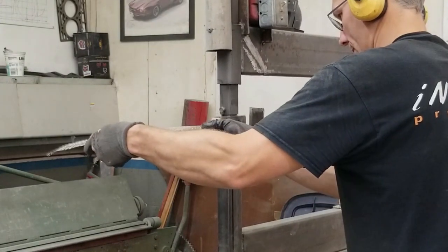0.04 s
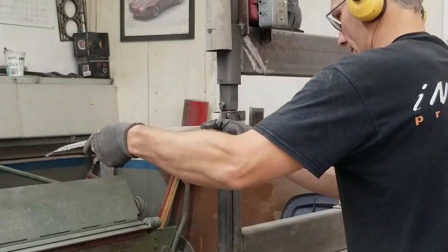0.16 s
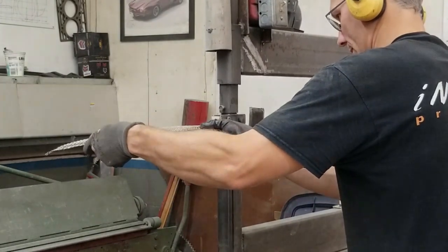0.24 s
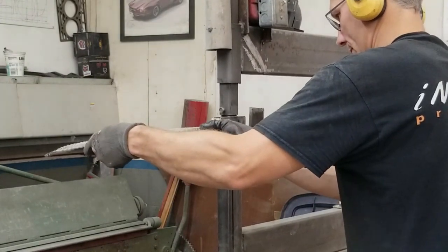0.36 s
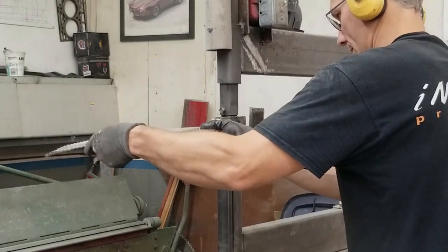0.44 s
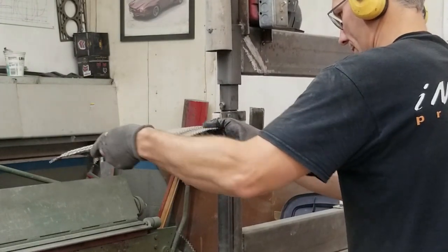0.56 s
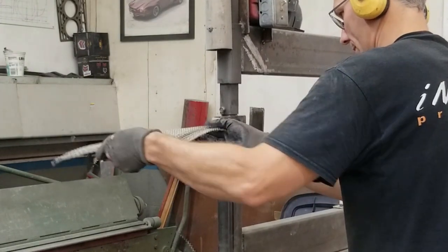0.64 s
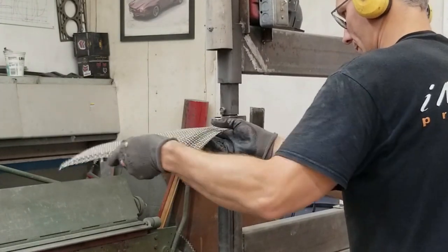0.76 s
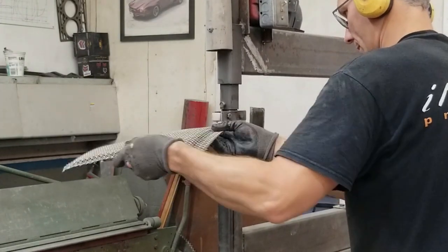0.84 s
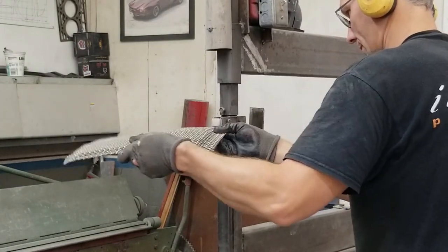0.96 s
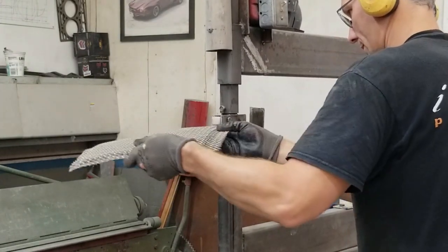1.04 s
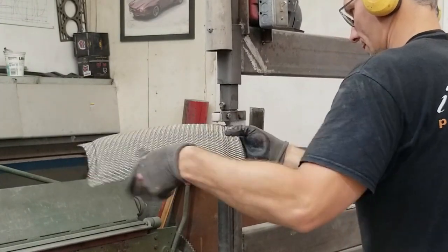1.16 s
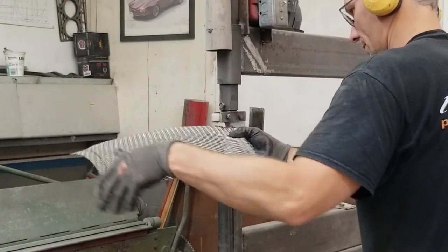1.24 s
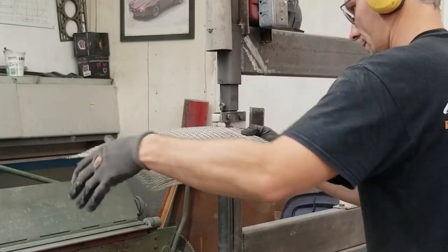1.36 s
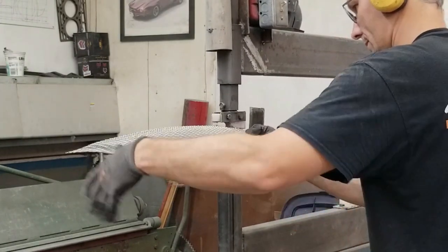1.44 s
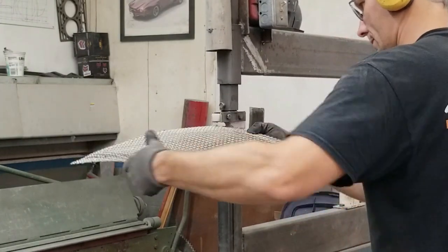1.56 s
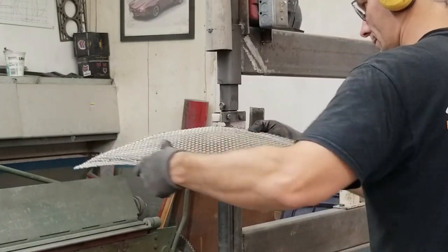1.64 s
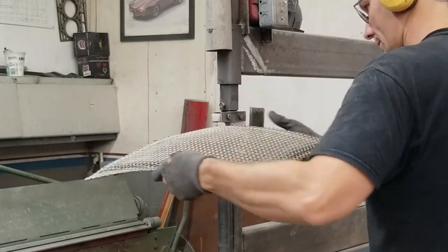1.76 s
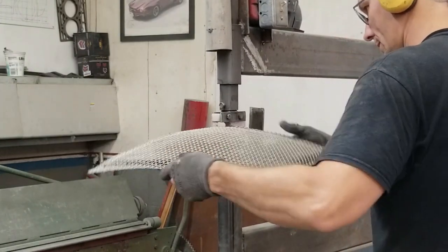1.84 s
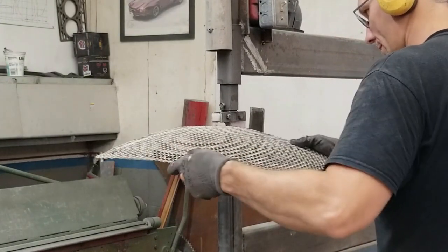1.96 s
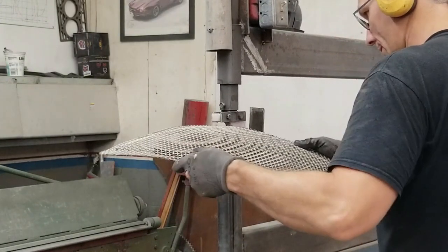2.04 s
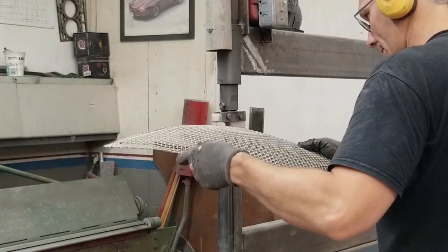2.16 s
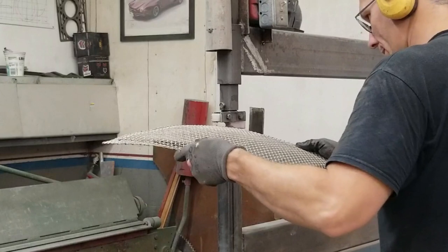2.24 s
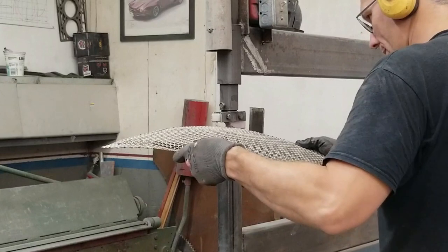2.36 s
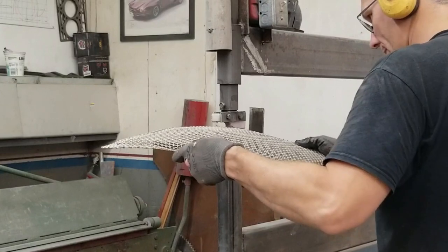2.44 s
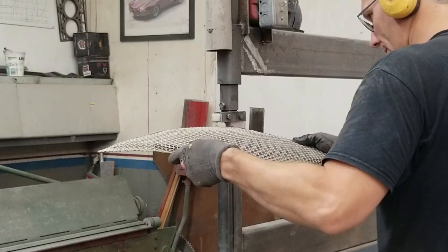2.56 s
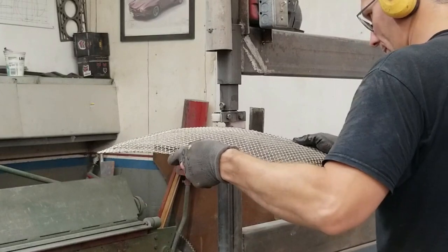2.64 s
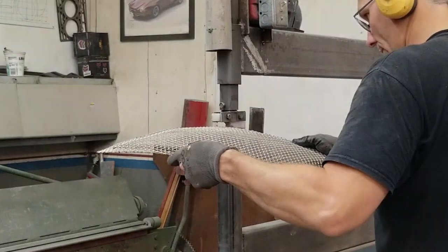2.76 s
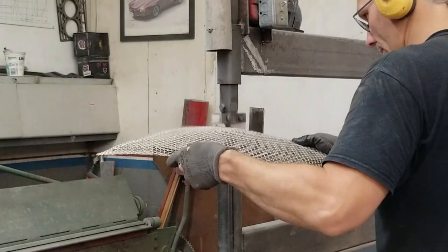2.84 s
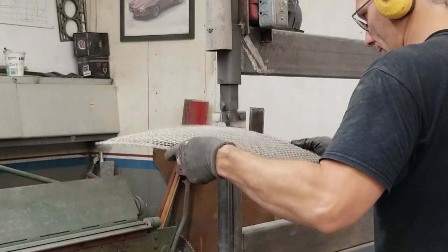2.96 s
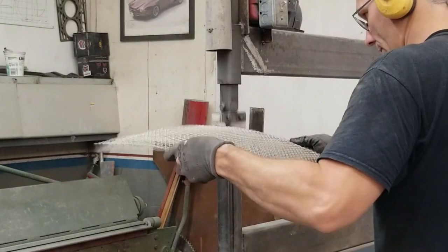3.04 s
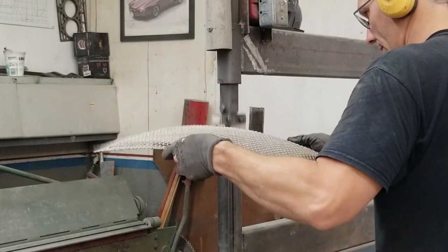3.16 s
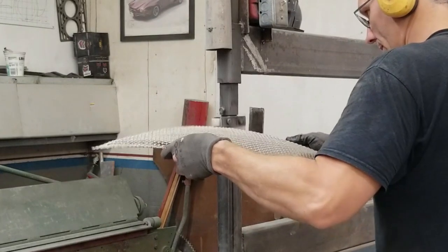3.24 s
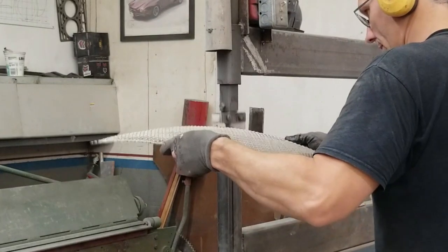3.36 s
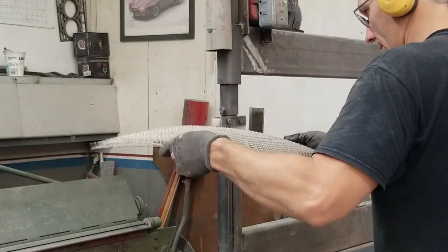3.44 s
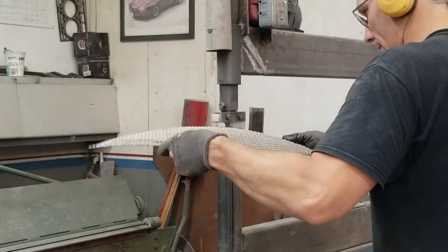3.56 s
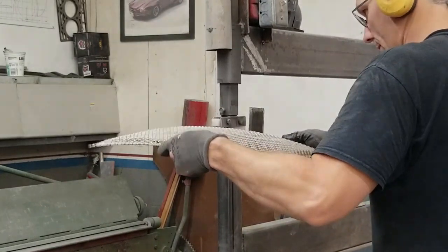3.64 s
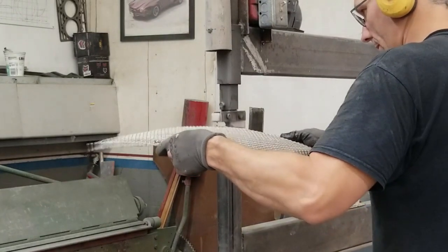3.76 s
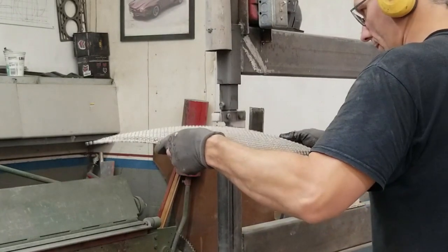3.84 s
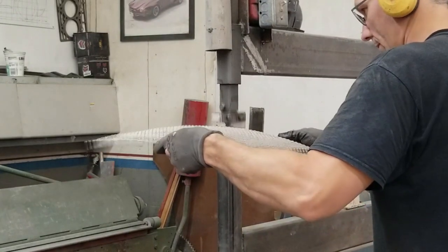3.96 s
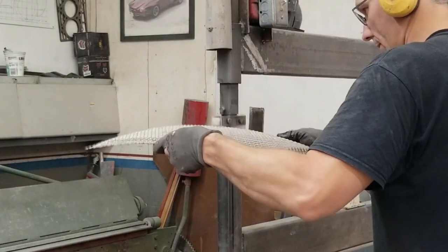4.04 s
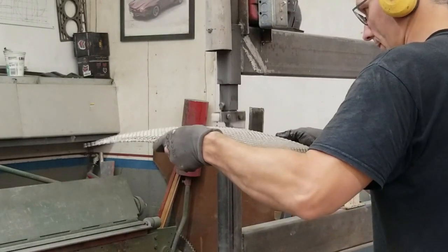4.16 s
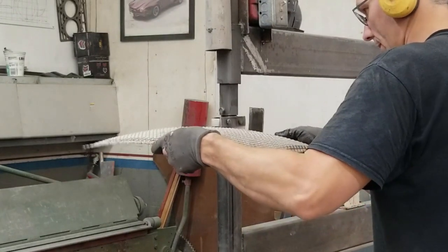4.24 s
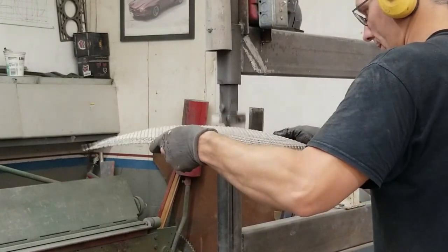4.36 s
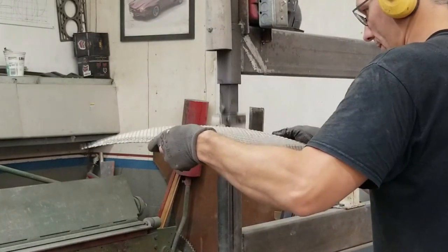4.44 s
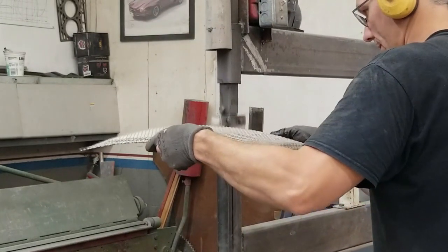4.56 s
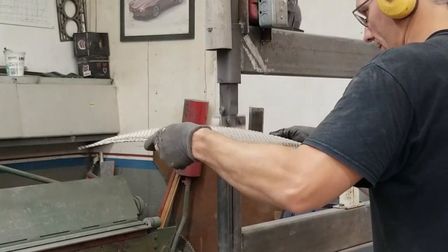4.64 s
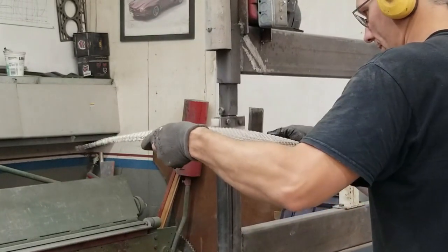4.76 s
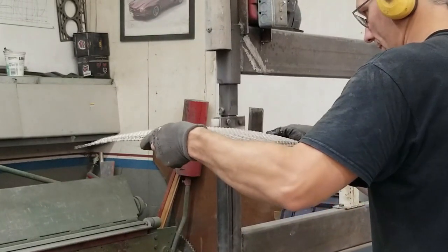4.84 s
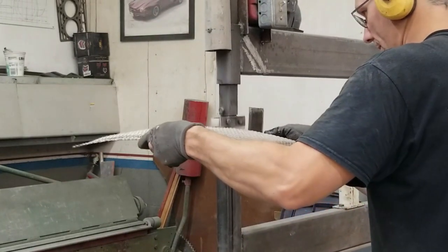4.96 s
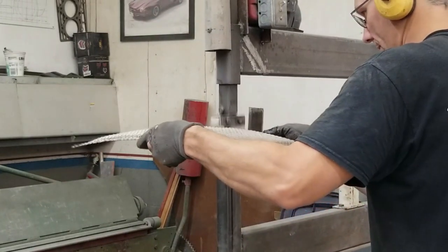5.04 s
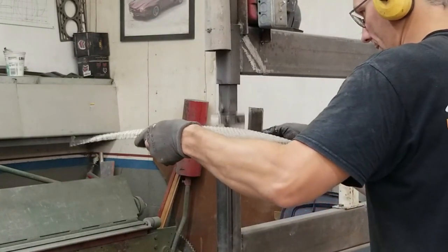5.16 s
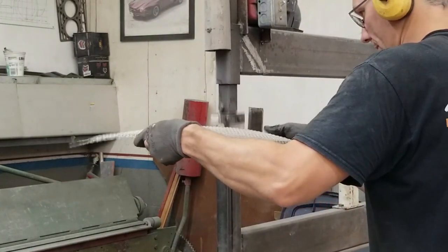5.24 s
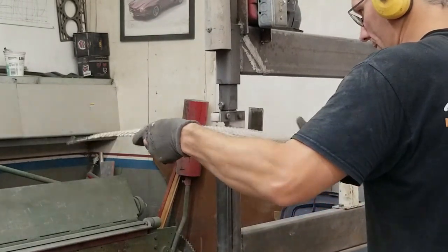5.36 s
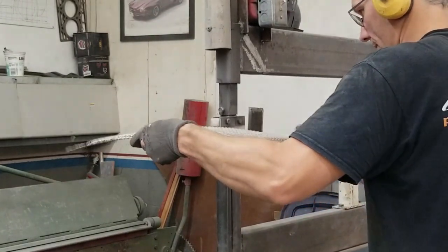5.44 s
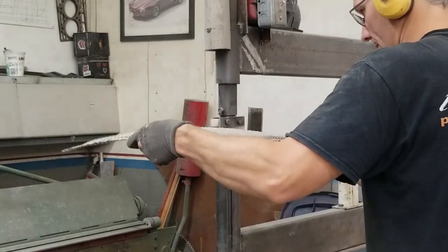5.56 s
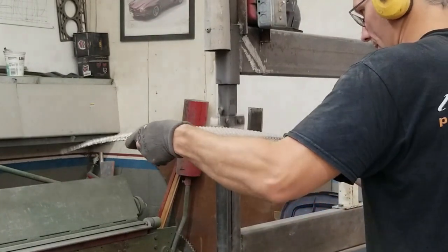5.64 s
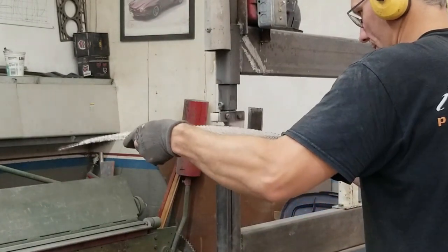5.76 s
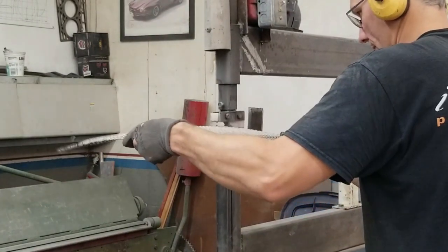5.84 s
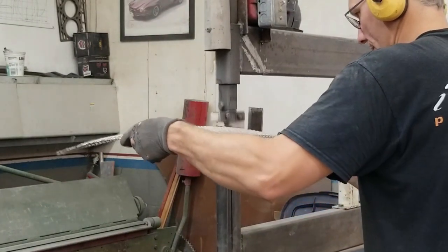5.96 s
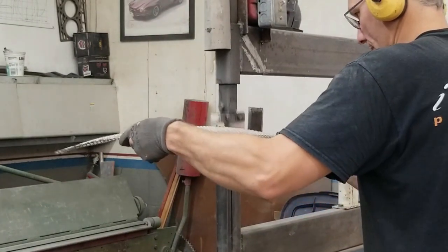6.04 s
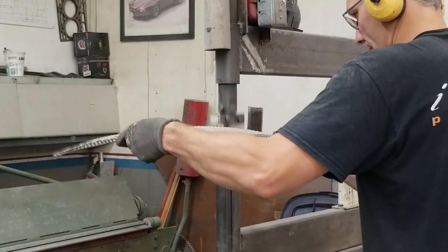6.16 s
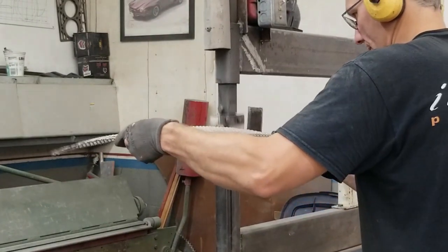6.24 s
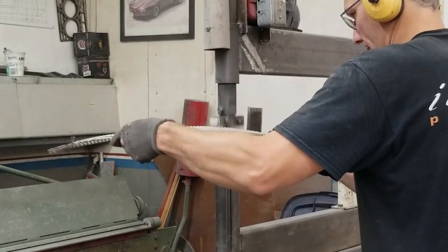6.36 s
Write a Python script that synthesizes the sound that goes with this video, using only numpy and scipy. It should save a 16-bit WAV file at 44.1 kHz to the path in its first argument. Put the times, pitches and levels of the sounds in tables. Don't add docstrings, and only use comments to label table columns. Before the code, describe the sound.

Rapid mechanical hammering, roughly fourteen blows a second, makes a sheet of steel mesh clatter and sizzle. After an opening tail and one slowing run comes nearly two seconds of faint workshop murmur, linkage ticks and ringing frame members. Bumps and a tiny squeak announce the restart; dense, distorted rattling then continues to the end, close to a crude camera microphone with short hard room reflections.

```python
import sys
import numpy as np
from scipy import signal
from scipy.fft import rfft, irfft
from scipy.io import wavfile
from scipy.ndimage import uniform_filter1d

SR = 44100
rng = np.random.default_rng(int(sys.argv[2]) if len(sys.argv) > 2 else 0)


def boost_factor(decibels):
    exponent = np.asarray(decibels, float) / 20
    return 10 ** exponent


def waveform_to_disk(signal):
    frames = np.transpose(np.atleast_2d(signal))
    scaled = np.clip(frames, -1, 1) * 32767
    samples = np.round(scaled).astype(np.int16)
    wavfile.write(sys.argv[1], SR, samples)


N = 282240
T = np.arange(N) / SR
HZ = np.fft.rfftfreq(N, 1 / SR)

# (frequency [Hz], width [Hz], level over the smooth spectrum [dB])
FRAME = [(98, 15, -4), (290, 60, -3), (584, 50, -2), (717, 50, -4), (815, 45, -4), (1282, 45, -5),
         (1444, 90, -7), (1745, 25, -5), (1845, 35, -3), (2140, 50, -5), (2461, 45, -6), (2707, 45, -6),
         (3450, 90, -5), (4200, 400, -9), (4242, 35, -6), (4640, 70, -4), (4899, 16, -6), (5205, 30, -9),
         (5444, 20, -4), (5940, 45, -4), (6633, 16, -2), (6982, 40, -6), (7300, 600, -7), (8230, 30, -6),
         (8435, 70, -4), (12250, 450, -6)]
# (time [s], gain [dB])
GATE = [(2.33, 0), (2.45, -11), (2.67, -21), (2.69, -6)]


def evened(x):
    return x / np.sqrt(np.mean(x ** 2) + 1e-20)


def read(points, hz):
    f, value = np.transpose(points)
    return np.interp(np.log(hz + 1), np.log(f + 1), value)


def coloured(x, spectrum, modes):
    ringing = sum(boost_factor(db) / (1 + 2j * (HZ - hz) / width) for hz, width, db in modes)
    return irfft(rfft(x) * boost_factor(read(spectrum, HZ)) * (1 + ringing), N)


def layers(x, edges_hz):
    below = [0] + [1 / (1 + (HZ / hz) ** 4) for hz in edges_hz] + [1]
    return [evened(irfft(rfft(x) * (upper - lower), N)) for lower, upper in zip(below, below[1:])]


def patchy(x, depth_db):
    z = signal.stft(x, nperseg=512, noverlap=384)[2]
    field = uniform_filter1d(rng.standard_normal(z.shape), size=5, axis=0)
    field = uniform_filter1d(field, size=14, axis=1)
    return signal.istft(z * boost_factor(depth_db * evened(field)), nperseg=512, noverlap=384)[1][:N]


def blows():
    # (first [s], last [s], rate [blows/s], slowing [blows/s^2])
    strokes = [
        (.006, .2, 13, 9.6),
        (0.371, .98, 13.5, 2.3),
        (2.938, 3.63, 14.2, 3.5),
        (3.728, 4.36, 13.6, 0.84),
        (4.425, 5.4, 14.3, .02),
        (5.435, 6.4, 13.8, .05),
    ]
    uneven_db, jitter_s = 1.5, 0.0018
    hits = []
    for first, last, per_s, slowing in strokes:
        t = np.arange(0, last - first, 1 / SR)
        count = np.floor(per_s * t - slowing * t ** 2 / 2)
        at = np.flatnonzero(np.diff(count, prepend=-1) > 0) / SR
        late, db = rng.standard_normal((16, 2))[:len(at)].T
        hits += zip(abs(first + at + jitter_s * late), uneven_db * db)
    return hits


def force(lag, loss):
    # (start [s], full force [s], frame boom [dB], fall [dB/s], bend [dB/s^2])
    runs = [
        (-.4, -0.202, -24.5, 25.5, 27),
        (0.358, 0.527, -24.5, 11.5, 40),
        (2.937, 3.042, -19, 11.5, 20.5),
        (3.727, 3.955, -20, 22, 10.5),
        (4.355, 4.508, -21.5, 4.5, -2),
    ]
    # (time [s],
    # width [s], depth [dB])
    eases = [
        (.395, .01, 3.5),
        (.43, 0.011, 2),
        (3.775, .025, 3.5),
        (4.62, 0.072, -0.5),
        (5.0, .04, -0.5),
        (5.5, 0.037, 3),
        (5.78, 0.046, 1.5),
        (5.7, 0.62, -0.67),
    ]
    rise_db, attack_s = 11.5, 0.011
    levels = []
    for start, top, db, fall, bend in runs:
        after = (T - top).clip(0)
        short = ((top - T) / (top - start)).clip(0)
        level = boost_factor(db - lag * rise_db * short ** 2 - loss * (fall * after + bend * after ** 2))
        levels.append(level * ((T - start) / attack_s).clip(0, 1))
    eased = sum(depth_db * np.exp(-.5 * ((T - s) / width) ** 2) for s, width, depth_db in eases)
    return np.max(levels, axis=0) * boost_factor(-eased * lag ** 2 / 2)


def throb(hits, rise_s, fall_s, between_db):
    s, db = np.transpose(hits)
    kicks = np.zeros(N)
    kicks[np.minimum(s * SR, N - 1).astype(int)] = boost_factor(db) ** 2
    t = T[:SR // 4]
    shake = np.exp(-t / fall_s) - np.exp(-t / rise_s)
    power = boost_factor(between_db) ** 2 + signal.oaconvolve(kicks, shake)[:N].clip(0)
    return np.sqrt(power / uniform_filter1d(uniform_filter1d(power, 5000), 5000))


def hammer(contacts_per_s=5000, spread_db=3.0, direct_db=-3):
    # (frequency [Hz], level [dB per Hz])
    steel_colour = [(18, -74.5), (30, -50), (86, -18), (252, -11), (287, -10), (355, -8), (540, -2.5),
                    (584, -0.5), (702, 1), (962, -1), (1460, -4.5), (3060, -12.5), (4300, -12), (9970, -27),
                    (16000, -48)]
    # (time [s], strength [dB])
    slaps = [(.445, 3.5), (.512, 2), (2.9746, -4), (2.993, -7), (3.0339, 2), (3.8142, 9), (4.2766, 3),
             (4.3395, -7), (4.3849, 0), (4.4188, 3), (4.505, 3), (4.58, 2), (4.61, 0), (4.71, -13),
             (4.7929, 4), (4.9167, 1), (4.985, 4), (5.085, 4), (5.2, 5), (5.545, 3), (5.62, 0), (5.7712, 4),
             (5.845, -4), (6.06, 0), (6.26, 3), (6.3699, 1)]
    clatter_db, sizzle_db = -7.5, -13.5
    sizes = boost_factor(spread_db * np.minimum(rng.exponential(1, N), 5)) * rng.choice([-1., 1.], N)
    hail = evened(sizes * (rng.random(N) < contacts_per_s / SR))
    wash = rng.standard_normal(N)
    steel = coloured(boost_factor(direct_db) * hail + wash, steel_colour, FRAME)
    boom, clatter, sizzle = layers(patchy(steel, depth_db=1.0), (2150, 6500))
    hits = blows()
    boom = boom * throb(hits, 0.006, 0.051, -3.5)
    clatter = clatter * throb(hits, 0.0023, 0.039, -1.7) * throb(slaps, 0.00084, 0.018, 4.3)
    sizzle = sizzle * throb(hits, 0.0052, .03, -1.5) * throb(slaps, .001, .012, 0)
    return (boom * force(lag=0.93, loss=1)
            + boost_factor(clatter_db) * clatter * force(lag=1.1, loss=1.19)
            + boost_factor(sizzle_db) * sizzle * force(lag=2.1, loss=1.48))


def shop():
    # (frequency [Hz], level [dB per Hz])
    murmur = [(24, -39), (60, -20.5), (150, -8), (300, -5), (600, -1.5), (1200, -4), (2300, -6.5),
              (4500, -18.5), (7500, -28.5), (10500, -39.5), (16000, -55.5)]
    # (frequency [Hz], width [Hz], level [dB])
    panels = [(298, 5.4, 8), (317, 6, 5.5), (427, 8, 3), (480, 8, 8.5), (560, 4.8, 4), (665, 13, 11),
              (820, 14, 9), (885, 23, 8), (1092, 11, 6.5), (1373, 7.4, 7.5), (1600, 12, 7.5),
              (1950, 20, -5.5)]
    # (time [s], level [dB])
    windup = [(2.69, -82), (2.78, -61), (2.83, -50.5), (2.87, -42), (2.92, -39), (2.96, -33)]
    # ([dB], [dB], [dB], [dB])
    floor_db = (-80, -79.5, -93, -96.5)
    glow_db = (-70.5, -65, -77.5, -96)
    shuffle_db = (-83, -88, -104, -87.5)
    windup_db, windup_steep = (-4, 3.5, -7.5, -9), (1.2, 1, 0.91, 1.3)
    noise = coloured(rng.standard_normal(N), murmur, panels)
    parts = layers(patchy(noise, depth_db=2.0), (500, 2000, 5000))
    glow = boost_factor(-45 * abs(T - 1.34))
    shuffle = np.exp(-.5 * ((T - 2.14) / .18) ** 2)
    spin_db, top_db = np.interp(T, *np.transpose(windup), -140, -140), windup[-1][1]
    out = np.zeros(N)
    for part, still, hum, glove, spin, steep in zip(parts, floor_db, glow_db, shuffle_db, windup_db, windup_steep):
        drive = boost_factor(spin + top_db + steep * (spin_db - top_db))
        out += part * (boost_factor(still) + boost_factor(hum) * glow + boost_factor(glove) * shuffle + drive)
    return out * boost_factor(np.interp(T, *np.transpose(GATE)))


def room():
    # (frequency [Hz], t60 [s])
    decay = [(100, .9), (500, 0.5), (2000, 0.27), (6000, 0.65), (14000, 0.54)]
    taps = np.zeros(SR)
    at = np.arange(200, SR - 20, 20)
    taps[at + rng.integers(0, 20, len(at))] = rng.choice([-1., 1.], len(at))
    hz, t, z = signal.stft(taps, SR, nperseg=256)
    tail = signal.istft(z * boost_factor(-60 * t / read(decay, hz)[:, None]), SR, nperseg=256)[1]
    return tail / np.linalg.norm(tail)


def knocks():
    # (time [s], peak [dB], centre [Hz], t60 [s])
    tick_rows = [(.173, -40, 6000, .08), (.298, -47, 9000, .05), (.354, -37, 4000, 0.04),
                 (1.187, -59, 5000, .03), (1.295, -65, 8000, .03), (1.33, -50, 2380, .1),
                 (1.58, -56, 6500, 0.016), (1.589, -71, 7040, 0.027), (1.734, -47, 4300, 0.0058),
                 (1.942, -69, 4070, .015), (1.975, -72, 4480, .015), (2.009, -60, 7500, .01),
                 (2.34, -71, 3800, .026), (2.8535, -47, 7700, .02), (2.872, -54, 8500, .02),
                 (2.893, -46, 10000, .03), (2.9006, -26.5, 8500, 0.016), (2.9292, -34, 8000, 0.032),
                 (3.765, -32, 11000, .05)]
    # (time [s], peak [dB], centre [Hz], t60 [s])
    crack_rows = [(.3657, -23.5, 6000, 0.03), (0.3728, -24.5, 2500, 0.048), (0.4064, -25.5, 4500, 0.031),
                  (1.088, -39, 5000, 0.059), (2.777, -49.5, 5950, .2), (2.943, -24, 3000, 0.044),
                  (2.951, -19, 6000, .03), (3.729, -38, 2200, .05), (3.809, -21, 2000, .04)]
    # (time [s], peak [dB], frequency [Hz], t60 [s])
    ping_rows = [(.4075, -23, 3320, .037), (.44, -31, 4200, .06), (1.089, -50, 7300, .05),
                 (1.091, -39.5, 3500, 0.11), (1.092, -34.5, 1785, 0.11), (1.7565, -61, 2600, .08),
                 (2.19, -66, 3900, .2), (2.195, -56, 1510, .08), (2.7775, -50.5, 5400, 0.18),
                 (2.779, -61, 6700, 0.17), (2.853, -32.5, 620, 0.12), (2.853, -44, 3450, .1),
                 (2.901, -35, 7840, 0.034), (3.728, -42, 8350, 0.068)]
    # (time [s], peak [dB], centre [Hz], echo [dB])
    bump_rows = [(1.422, -53, 650, -4), (1.7554, -48.5, 1300, 1), (1.757, -61, 2800, 0),
                 (1.925, -63.5, 604, -10), (2.0, -62, 600, 3), (2.122, -70, 704, 4), (2.147, -58, 850, 6.5),
                 (2.1863, -60, 1900, 1), (2.241, -65, 332, 0), (2.675, -57.5, 1000, 2), (2.68, -72, 450, 6),
                 (2.7452, -47, 1180, 2.5), (2.834, -51, 900, -4), (2.8528, -32, 1300, 2.5),
                 (3.73, -27, 900, -3), (2.8, -57, 250, 6)]
    # (frequency [Hz], gain [dB])
    air = [(20, 0), (8000, 0), (11500, -7), (16000, -22)]
    # t60 [s], bandwidth [octaves] or echo [dB]
    rows = [(*row, .6, -11) for row in tick_rows]
    rows += [(*row, 1.4, -8) for row in crack_rows]
    rows += [(*row, .07, -7) for row in ping_rows]
    rows += [(s, db, hz, 0.16, 0.72, echo_db) for s, db, hz, echo_db in bump_rows]
    size = SR // 2
    t, hz, tail = T[:size], np.fft.rfftfreq(size, 1 / SR), room()[:size]
    out = np.zeros(N + size)
    for s, db, centre_hz, t60, octaves, echo_db in rows:
        grit = rng.standard_normal(size)
        colour = np.exp(-.5 * (np.log2((hz + 1) / centre_hz) / octaves) ** 2)
        envelope = boost_factor(db - 5.5 - 60 * t / t60) * (1 - np.exp(-t / .0004))
        burst = evened(irfft(rfft(grit) * colour, size)) * envelope
        echo = boost_factor(echo_db) * signal.fftconvolve(burst, tail)[:size]
        out[round(s * SR):][:size] += burst + echo
    return coloured(out[:N], air, FRAME)


def rings():
    # (frequency [Hz], level [dB], t60 [s])
    members = [(286, -7, 2.8), (335, -1.5, 1.8), (414, -12, 1.8), (470, 1, 1.16), (590, -2, 2.2),
               (613, -2, 2.2), (635, -4, 1.47), (854, -11, 1.6), (1074, -8, 2), (1390, -3, 1.8),
               (1443, -11.5, 1.8), (1562, -6, 1.3), (2090, -3, 1.8)]
    # (time [s], level [dB], centre [Hz], reach [octaves])
    jolts = [
        (1.09, -59, 700, 2.1),
        (1.756, -71, 1000, .8),
        (2.145, -72.5, 500, 0.78),
        (2.19, -71, 1250, .35),
        (2.677, -64, 700, 1.05),
    ]
    out = np.zeros(N)
    hz, own_db, t60 = np.transpose(members)[:, :, None]
    for s, db, centre_hz, octaves in jolts:
        t = T[:min(N - round(s * SR), SR * 3 // 2)]
        reach = np.exp(-.5 * (np.log2(hz / centre_hz) / octaves) ** 2)
        sines = np.sin(2 * np.pi * (hz * t + rng.random(hz.shape)))
        dying = reach * boost_factor(db + own_db - 60 * t / t60) * sines
        out[round(s * SR):][:len(t)] += dying.sum(0) * (1 - np.exp(-t / 0.0017))
    return out * boost_factor(0.43 * np.interp(T, *np.transpose(GATE)))


def squeaks(length_s=0.01):
    # (time [s], from [Hz], to [Hz], level [dB])
    bites = [
        (2.7765, 1020, 1090, -39),
        (2.7875, 1000, 1150, -39),
    ]
    out, t = np.zeros(N), T[:round(length_s * SR)]
    for s, from_hz, to_hz, db in bites:
        turns = from_hz * t + (to_hz - from_hz) * t ** 2 / (2 * length_s)
        swell = np.sin(np.pi * t / length_s) ** .5
        out[round(s * SR):][:len(t)] += boost_factor(db) * swell * np.sin(2 * np.pi * turns)
    return out


def scene():
    return np.tile(hammer() + shop() + knocks() + rings() + squeaks(), (2, 1))


def roll_off(x):
    return signal.sosfilt(signal.butter(12, 16510, fs=SR, output="sos"), x)


def record(dry):
    # (time [s], level [dB])
    sag = [(1, -14.5), (2.9, -9.5), (3.1, -10), (3.4, -12), (4.5, -12.7), (5.0, -15)]
    # (frequency [Hz], gain [dB])
    response = [(15, -27.5), (45, -13.5), (90, -4), (200, 0), (11000, -1), (13000, -1), (15700, 3)]
    edge_hz, slope_hz, hardness = 15770, 70, 5
    ceiling = boost_factor(np.interp(T, *np.transpose(sag)))
    squeezed = dry / (1 + abs(dry / ceiling) ** hardness) ** (1 / hardness)
    band = np.sin(np.pi / 2 * ((edge_hz - HZ) / slope_hz).clip(0, 1)) ** 2
    heard = irfft(rfft(squeezed) * boost_factor(read(response, HZ)) * band, N)
    return roll_off(heard)


dry = scene()
out = record(dry)
waveform_to_disk(out)
```